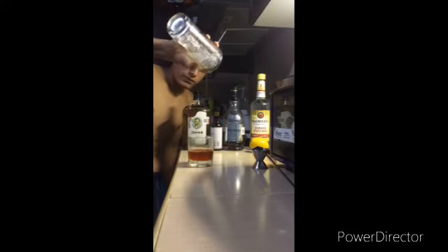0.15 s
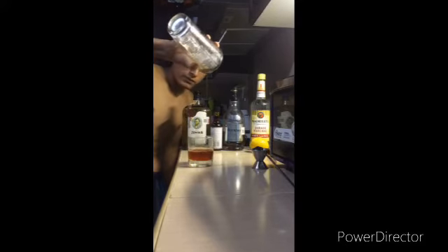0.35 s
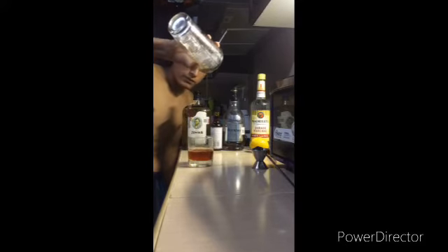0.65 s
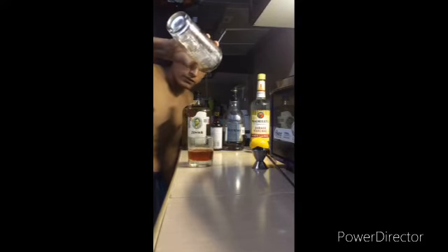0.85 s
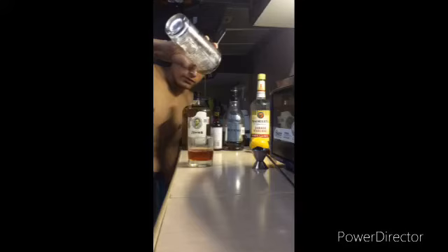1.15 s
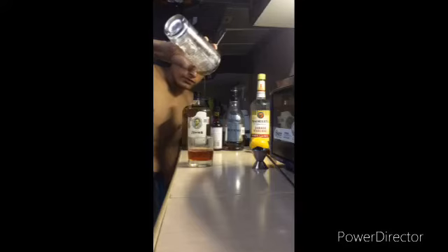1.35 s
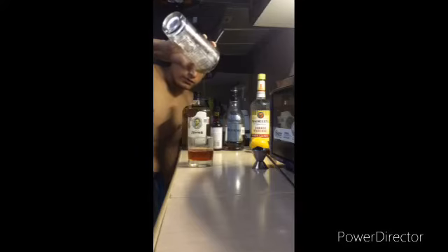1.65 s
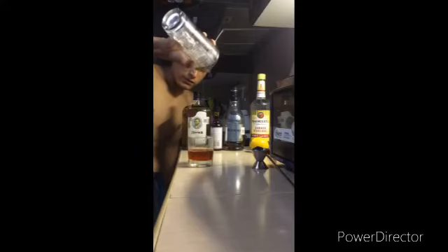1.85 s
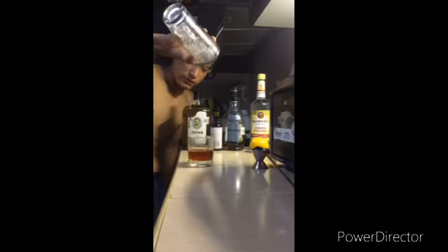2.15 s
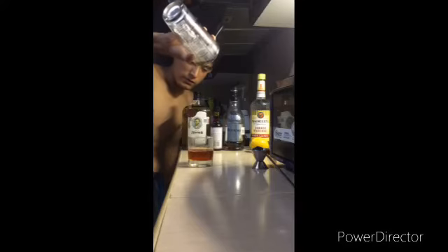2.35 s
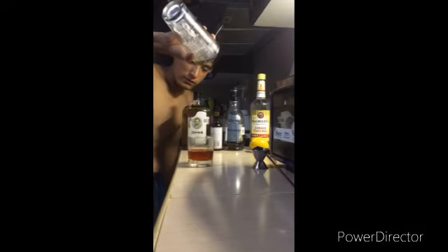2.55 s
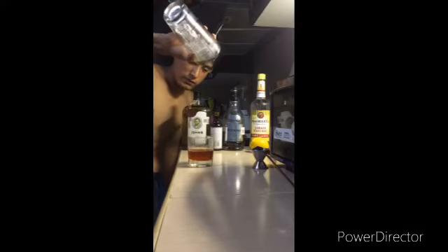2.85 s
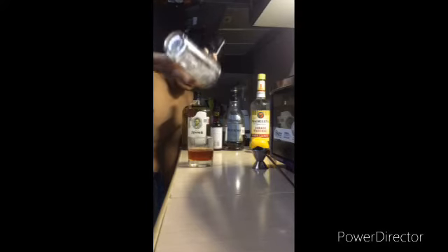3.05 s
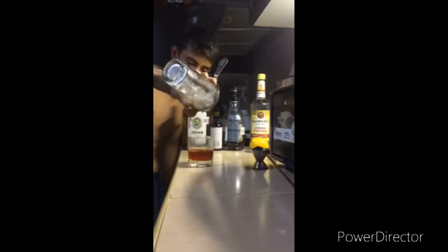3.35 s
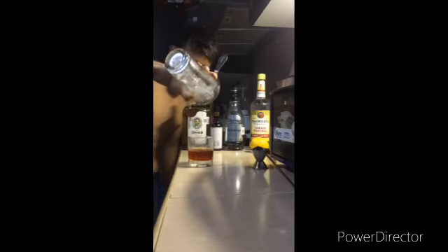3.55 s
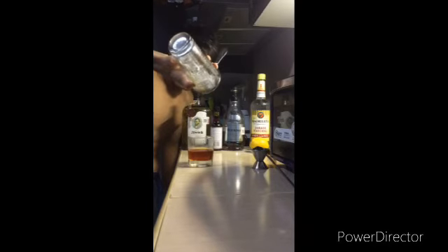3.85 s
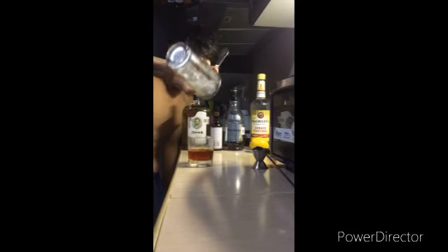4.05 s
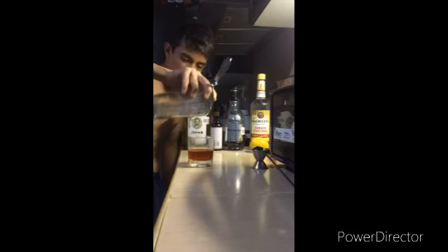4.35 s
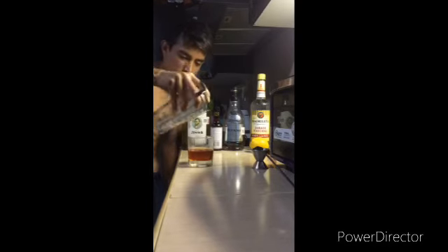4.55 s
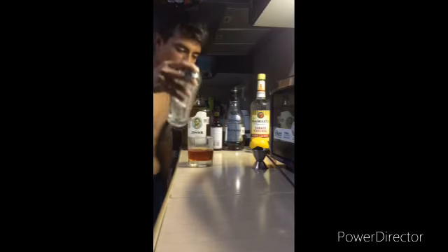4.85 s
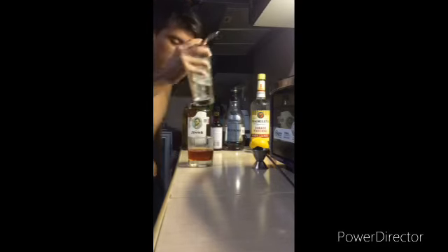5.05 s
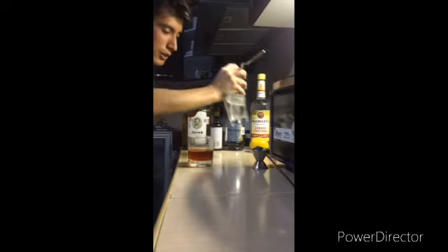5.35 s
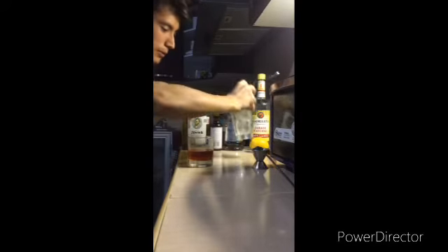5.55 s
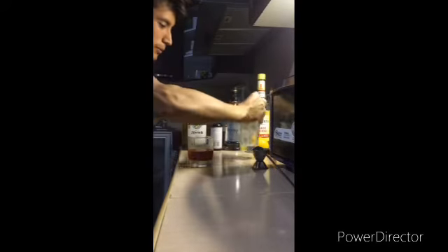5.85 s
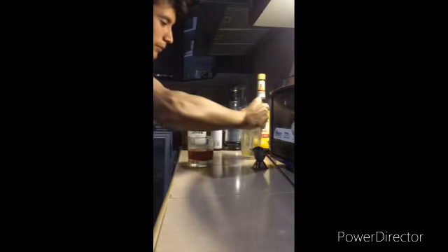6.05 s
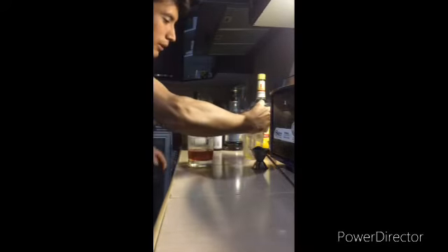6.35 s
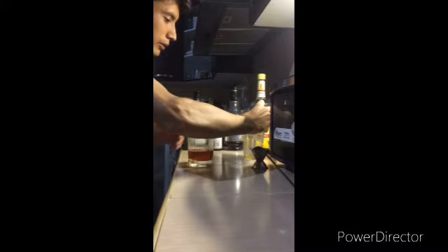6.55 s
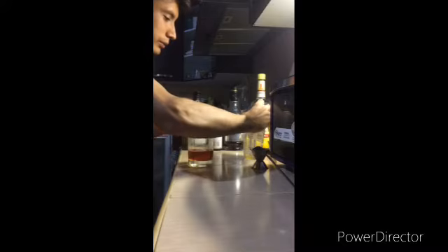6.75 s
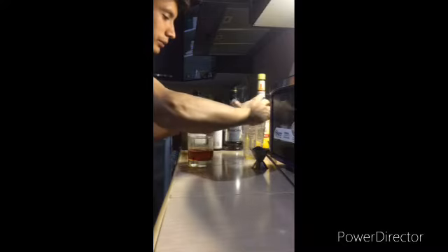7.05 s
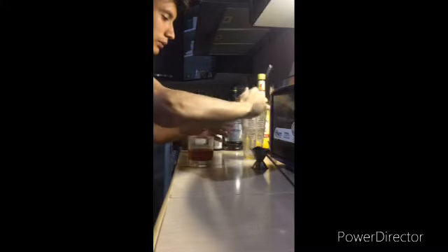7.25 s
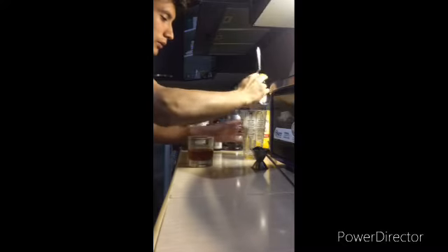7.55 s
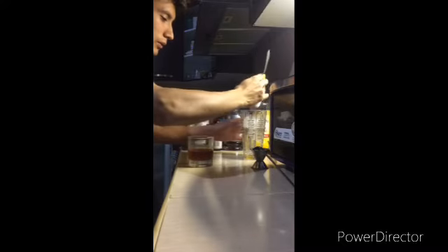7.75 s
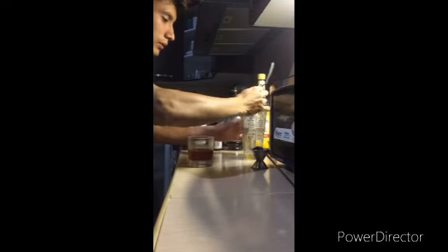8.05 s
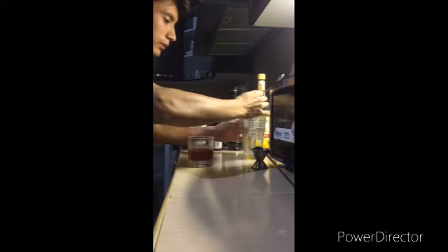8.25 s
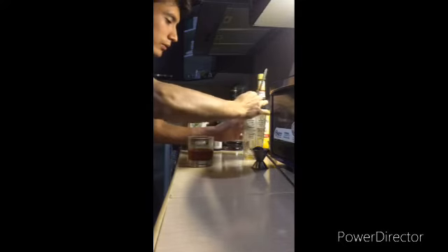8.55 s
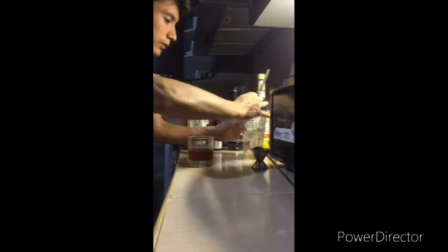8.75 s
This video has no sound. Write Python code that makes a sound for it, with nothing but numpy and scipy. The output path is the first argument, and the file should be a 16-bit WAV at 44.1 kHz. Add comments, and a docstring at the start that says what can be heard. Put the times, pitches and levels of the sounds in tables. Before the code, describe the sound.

Small, rounded water plinks and tiny high ticks of spray grow sparse over a quiet refrigerator hum. A glass is tipped upright, its ice clattering in a quick flurry and sliding to rest. A sudden dull, heavy glass-on-counter thump dominates everything, then small knocks and sporadic clinks lead to a brisk steel-on-glass rattle. Close microphone, short indoor reverberation.

```python
"""In a small room with a humming fridge, the last of a cocktail drips from a strainer into a tumbler.
Trapped air bubbles plink as damped, gliding sines; droplets tick as short bursts of filtered noise.
The mixing glass is tipped upright and its ice tumbles back, as clusters of ringing modes and cracks,
and slides to rest in a hiss. The same contact model, with other modes, sets the glass down hard
on the counter, then rattles the steel strainer and bar spoon against it."""
import sys
import numpy as np
from scipy import signal
from scipy.fft import rfft, irfft
from scipy.io import wavfile

SR = 44100
rng = np.random.default_rng(int(sys.argv[2]) if len(sys.argv) > 2 else 0)


def master_out(mix):
    """Clip the mix to full scale and print it as 16-bit PCM to the path in sys.argv[1]."""
    frames = np.transpose(np.atleast_2d(mix))
    ceiling = np.clip(frames, -1, 1)
    pcm = np.round(ceiling * 32767).astype(np.int16)
    wavfile.write(sys.argv[1], SR, pcm)


N = 392031
TIME = np.arange(N) / SR
CUTOFF_HZ = 15900


def from_db(db):
    """Decibels to gain."""
    return 10 ** (np.asarray(db) / 20)


def rms_one(x):
    """Scale to rms 1."""
    return x / np.sqrt(np.mean(x ** 2) + 1e-20)


def in_time(rows):
    """Each column of a curve at every sample."""
    s, *columns = np.transpose(rows)
    return [np.interp(TIME, s, c) for c in columns]


def at_hz(points, hz):
    """Read a table on a log-frequency axis."""
    f, value = np.transpose(points)
    return np.interp(np.log(np.maximum(hz, 1)), np.log(f), value)


def band(x, low, high):
    """Causal band-pass."""
    return signal.sosfilt(signal.butter(2, [low, high], "band", fs=SR, output="sos"), x)


def fade(t, t60):
    """Exponential decay that falls 60 dB in t60 seconds."""
    return np.exp(-np.log(1000) * t / t60)


def add(out, s, sound):
    """Mix a sound in at a time."""
    i = max(round(s * SR), 0)
    out[i:i + len(sound)] += sound[:max(N - i, 0)]


def coloured(points):
    """Steady noise with a given spectrum, rms 1."""
    hz = np.arange(N // 2 + 1) * SR / N
    return rms_one(irfft(rfft(rng.standard_normal(N)) * from_db(at_hz(points, hz)), N))


def drift(rate):
    """Slow random wandering between knots at this rate per second, knot spread 1."""
    knots = rng.standard_normal(int(rate * N / SR) + 2)
    return np.interp(TIME * rate, np.arange(len(knots)), knots)


# fridge tones: pitch_hz [Hz], level_db [dB rms]
FRIDGE_TONES = [(59.6,-68.5),(119.2,-66.5),(214.5,-61),(286.6,-68.5),(426,-69),(588,-75),(710.6,-76),(1184,-79),(3548,-85.5),(3666,-78),(3725.5,-79.5),(4673,-86.5)]
# rumble spectrum: pitch_hz [Hz], level_db [relative dB per Hz]
RUMBLE_COLOUR = [(15, -58), (25, -20), (70, -10.5), (180, -9), (217, 2.5), (263, -14), (427, -8),
                 (463, -18.5), (575, -17), (754, -27), (1190, -27.5), (2910, -35.5), (3620, -37),
                 (3920, -39), (16000, -46.5)]


def fridge(rumble_db=-54, wander=0.5):
    """Steady-level motor tones wander slightly in phase over a steady rumble of shaped noise."""
    tones = np.zeros(N)
    for hz, db in FRIDGE_TONES:
        phase = 2 * np.pi * hz * TIME + wander * np.pi * drift(4.4)
        tones += from_db(db) * np.sqrt(2) * np.sin(phase)
    return tones + from_db(rumble_db) * coloured(RUMBLE_COLOUR)


def bubble(hz, rise, t60, attack_s):
    """A bubble rings as a damped sine whose pitch climbs, an octave at most, as it nears the surface."""
    t = TIME[:int(t60 * SR) + 2]
    swell = (1 - np.exp(-t / attack_s)) * fade(t, t60)
    pitch = hz * (1 + np.tanh(rise * t))
    return swell / swell.max() * np.sin(2 * np.pi * np.cumsum(pitch) / SR)


# a deep bubble at BUBBLE_HZ rings for BUBBLE_T60_S; the damping power shortens it with pitch
BUBBLE_T60_S, BUBBLE_HZ, BUBBLE_DAMPING = 0.069, 1400, 1.37
SHALLOW_RISE_PER_S = 88   # a bubble that climbs this fast is near the surface and rings half as long


def ring_time(hz, rise):
    """Small bubbles die sooner, and so do shallow, fast-climbing ones."""
    deep_t60 = BUBBLE_T60_S * (BUBBLE_HZ / hz) ** BUBBLE_DAMPING
    return deep_t60 / (1 + abs(rise) / SHALLOW_RISE_PER_S)


def splash(hz, t60, width=1.3):
    """A droplet lands with a brief, broad tick of band-passed noise; peak 1."""
    t = TIME[:SR // 30]
    tick = band(rng.standard_normal(len(t)) * fade(t, t60), hz / width, min(hz * width, CUTOFF_HZ))
    return tick / np.abs(tick).max()


# drops that trap an air bubble: start_s [s], level_db [dB peak before trims],
# pitch_hz [Hz at the start], rise_per_s [initial pitch rise, share per s]
DROPS = [(0.016,-47,1426,10), (0.078,-53.5,1008,2.5), (0.118,-46.5,847,20.5), (.14,-49.5,1385,11),
         (.15,-49,1700,63), (.174,-45.5,963,25), (0.177,-56,2300,38), (0.1903,-36,1284,33),
         (.256,-54,3340,2), (.44,-45.5,1680,5), (.499,-57,2300,60), (.573,-37,2710,5.5),
         (.602,-35.5,1336,6.5), (.671,-48.5,1073,19), (.683,-46.5,1460,15), (0.709,-48,2660,59),
         (.874,-40.5,1048,27.5), (0.886,-44.5,1730,61), (.96,-39.5,2210,118), (.973,-43.5,2650,1),
         (1.094,-50.5,1750,85), (1.183,-43.5,2700,105), (1.196,-47.5,1850,97), (1.311,-48,1484,3),
         (1.41,-43,2310,4.5), (1.459,-48.5,1480,5), (1.48,-55,2550,94), (1.499,-43,2480,39),
         (1.557,-49.5,1450,71), (1.755,-45,1377,5), (1.776,-59,2700,43), (1.798,-34,1366,11),
         (1.986,-48,1404,9), (2.062,-51,1490,3.5), (2.127,-48.5,1400,4.5), (2.189,-53,1940,11),
         (2.303,-57.5,2850,13), (2.376,-38.5,1440,8), (2.407,-55,3380,7), (2.529,-34.5,1508,2),
         (2.639,-48.5,1770,-0.5), (2.743,-49.5,1323,4.5), (2.684,-54,2220,38), (2.811,-55,2580,-2),
         (2.866,-56,2710,2.5), (3.045,-57,2660,0), (4.096,-43.5,3585,12.5), (4.225,-43,1413,2.5),
         (4.289,-44.5,1373,2.5)]
# droplets thrown up by a drop fall back: mean delay, level, lowest pitch, pitch rise
REBOUND_S, REBOUND_DB, REBOUND_HZ, REBOUND_RISE_PER_S = .03, -58.5, 1890, 70
REBOUNDS_END_S = 1.9   # later drops throw up none


def plinks(plink_db=2.5, impact_db=-8):
    """Each drop ticks on the surface and traps a plinking bubble; the earlier ones throw up a droplet."""
    out = np.zeros(N)
    for s, db, hz, rise in DROPS:
        add(out, s, from_db(db + plink_db) * bubble(hz, rise, ring_time(hz, rise), attack_s=0.0013))
        add(out, s, from_db(db + impact_db) * splash(hz * 1.2, t60=.025, width=1.8))
        delay, octaves = rng.random(2)
        if s < REBOUNDS_END_S:
            small_hz = REBOUND_HZ * 2 ** octaves
            small_t60 = ring_time(small_hz, REBOUND_RISE_PER_S)
            droplet = bubble(small_hz, REBOUND_RISE_PER_S, small_t60, attack_s=0.00082)
            add(out, s + REBOUND_S * (.5 + delay), from_db(REBOUND_DB) * droplet)
    return out


# the loudest droplets of spray: start_s [s], level_db [dB peak before trim], pitch_hz [Hz]
SPRAY = [(.026,-47.5,6260), (0.088,-47,7700), (.385,-50,6130), (.4444,-50,11000), (.6912,-52,8900),
         (.7274,-50,6900), (.7571,-52.5,8830), (.9214,-43.5,9050), (1.0225,-50.5,8700), (1.2287,-45,7800),
         (1.3991,-41,9150), (1.4503,-43,12600), (1.8242,-47,11200), (2.019,-50,6500), (2.127,-54,6330),
         (2.2197,-41,10900), (2.4264,-48.5,11400), (2.6953,-50,6210), (2.928,-43,11700)]


def spray(trim_db=-2.5):
    """Flying droplets land as narrow, high ticks."""
    out = np.zeros(N)
    for s, db, hz in SPRAY:
        add(out, s, from_db(db + trim_db) * splash(hz, t60=0.027, width=1.14))
    return out


# thinning trickle: start_s [s], rate_per_s [fine bubbles per s]
TRICKLE = [(0, 169.5), (1.25, 140), (1.7, 55), (2.5, 30.5), (3.3, 0)]


def fizz(level_db=-64, spread_db=6.5):
    """Fine bubbles are born at random at the trickle's rate, a few much louder than most."""
    out = np.zeros(N)
    born = TIME[rng.random(N) < in_time(TRICKLE)[0] / SR]
    for s, (size, pitch) in zip(born, rng.random((len(born), 2))):
        hz = 1500 * 8 ** pitch
        db = level_db - spread_db * np.log(size + 0.1)
        add(out, s, from_db(db) * bubble(hz, rise=145, t60=17 / hz, attack_s=0.000095))
    return out


def tumbler(x, hz=1450, t60=0.049, ring_db=-4.5):
    """The air above the drink rings on after each drop, as one resonance."""
    r, w = from_db(-60 / (t60 * SR)), 2 * np.pi * hz / SR
    feed = np.array([1, 0, -1]) * (1 - r * r) / 2
    ring = signal.lfilter(feed, [1, -2 * r * np.cos(w), r * r], x + 1e-18)
    return x + from_db(ring_db) * ring


def drips():
    """Plinking drops, spray and fine fizz excite the air in the tumbler."""
    return tumbler(plinks() + spray() + fizz())


def mist(count=28, level_db=-59.5, spread_db=4.5, ends_s=2.7, lowest_hz=5030, span_octaves=1.3):
    """Faint droplets tick at random, ever more sparsely."""
    out = np.zeros(N)
    for when, size, pitch in rng.random((count, 3)):
        tick = splash(lowest_hz * 2 ** (pitch * span_octaves), t60=0.023, width=1.42)
        db = level_db - spread_db * np.log(size + 0.092)
        add(out, ends_s * (1 - np.sqrt(when)), from_db(db) * tick)
    return out


# reverberation: pitch_hz [Hz], t60_s [s]
ROOM_T60 = [(150,.44),(600,.38),(1400,.34),(2800,.27),(6000,.23),(12000,.17)]
# reverberation: pitch_hz [Hz], level_db [dB before each source's send]
ROOM_LEVEL = [(150,-7),(600,-6),(1400,-6),(2800,-7),(6000,-8),(12000,-11.5)]


def room(x, build_s=0.002):
    """Diffuse reflections that build up in a few ms and die sooner in the treble."""
    t, response = TIME[:SR * 3 // 5], 0
    edges = np.geomspace(90, CUTOFF_HZ, 13)
    for low, high in zip(edges, edges[1:]):
        hz = np.sqrt(low * high)
        build = 1 - np.exp(-(t / build_s) ** 2)
        tail = band(rng.standard_normal(len(t)), low, high) * fade(t, at_hz(ROOM_T60, hz)) * build
        even = np.sqrt(2 * (high - low) / SR / np.sum(tail ** 2))   # energy in proportion to bandwidth
        response = response + from_db(at_hz(ROOM_LEVEL, hz)) * tail * even
    return signal.fftconvolve(x, response)[:N]


def chatter(db, per_s, t60, lead_s):
    """One firm touch amid small skidding ones, which start just before it and die away after it."""
    t = TIME[:SR // 8] - 1 / 50
    skids = (rng.random(len(t)) < per_s / SR) * rng.standard_normal(len(t))
    swell = np.where(t < 0, np.exp(-np.abs(t) / lead_s), fade(np.abs(t), t60))
    touches = from_db(db) * skids * swell
    touches[SR // 50] = 1
    return touches


# boundaries of the low, middle, high and top zones of a contact: edge_hz [Hz]
ZONE_EDGES_HZ = [400, 950, 3400, 7200, 15000]


def contact_colour(colour, hollow_db, hardness):
    """A full blow lifts the body's hollow low zone; a hard one tilts up everything above the middle."""
    centres = np.sqrt(np.multiply(ZONE_EDGES_HZ[:-1], ZONE_EDGES_HZ[1:]))
    octaves = np.log2(centres / centres[1])
    return np.array(colour) + np.where(octaves < 0, hollow_db, hardness * octaves)


def voiced(x, zone_db):
    """Smoothly tilt a sound to bring its four pitch zones towards the given levels."""
    spectrum, hz = rfft(x), np.arange(len(x) // 2 + 1) * SR / len(x)
    gains = []
    for level_db, low, high in zip(zone_db, ZONE_EDGES_HZ, ZONE_EDGES_HZ[1:]):
        power = np.sum(np.abs(spectrum[(hz > low) & (hz < high)]) ** 2)
        gains.append((np.sqrt(low * high), level_db - 10 * np.log10(power)))
    return irfft(spectrum * from_db(at_hz(gains, hz)), len(x))


def blows(table, modes, colour, crack_db, crack_t60, crack_hz, ring_scale, contact_s, scatter,
          skid_db, skid_t60, lead_s, uneven_db):
    """Each contact cracks and rings the body's modes, with new strengths and slightly new pitches."""
    out, t = np.zeros(N), TIME[:SR // 5]
    hz, db, t60 = np.transpose(modes)[:, :, None]
    loose = scatter * np.minimum(hz / 3000, 1)   # the low modes shift least
    for s, level_db, hollow_db, hardness in table:
        strength, detune, phase = rng.standard_normal((3, len(modes), 1))
        tones = np.sin(2 * np.pi * (hz * (1 + loose * detune) * t + phase))
        rings = from_db(db + uneven_db * strength) * fade(t, t60 * ring_scale) * tones
        crack = from_db(crack_db) * band(rng.standard_normal(len(t)) * fade(t, crack_t60), *crack_hz)
        body = (rings.sum(0) + crack) * (1 - np.exp(-t / contact_s))
        touches = chatter(skid_db, per_s=600, t60=skid_t60, lead_s=lead_s)
        hit = signal.fftconvolve(touches, body)[:len(t)]
        hit = voiced(hit, contact_colour(colour, hollow_db, hardness))
        # the firm touch comes a fiftieth of a second into the chatter; its first 5 ms set the level
        add(out, s - 1 / 50, from_db(level_db) * hit / np.std(hit[SR // 50:SR // 40]))
    return signal.sosfilt(signal.butter(2, 110, "high", fs=SR, output="sos"), out)


def jostle(count=14, from_s=4.58, to_s=4.93, level_db=-38, spread_db=1.5, hollow_db=-6.0):
    """Light contacts of smaller cubes, unevenly spaced, while the ice tumbles."""
    place, size, hollow, hardness = rng.standard_normal((count, 4)).T
    s = np.linspace(from_s, to_s, count) + 0.0074 * place
    return list(zip(s, level_db + spread_db * size, hollow_db + 2 * hollow, hardness))


# ice against glass: start_s [s], level_db [dB rms at the touch, before trim],
# hollow_db [low-zone lift, dB], hardness [treble tilt, dB per octave]
ICE_HITS = [(4.224,-36.5,3,6.5), (4.234,-39.5,21,15), (4.283,-40,0,-4), (4.295,-33.5,21,3),
            (4.427,-27.5,-1,-3), (4.444,-34.5,-10,6.5), (4.456,-29,-9,-1), (4.482,-33.5,8,9),
            (4.562,-33.5,-10,0.5), (4.573,-26,-2.5,-4), (4.61,-31,-19,3), (4.622,-22.5,-9,3.5),
            (4.664,-21.5,-8,-2), (4.693,-25.5,5,-8), (4.713,-27,-3,2.5), (4.722,-22,-9,-3.5),
            (4.761,-23.5,-23,-5.5), (4.81,-21.5,3,0), (4.825,-35,-10,6), (4.859,-29,12,2),
            (4.887,-24,11.5,4.5), (4.917,-28.5,-4,2.5), (5.015,-38.5,13.5,1.5), (5.054,-32,10,-2),
            (5.345,-36.5,21,-8), (5.374,-18,-8,2)]
# its modes: pitch_hz [Hz], level_db [dB before colouring], t60_s [s before ring_scale]
ICE_MODES = [(547,-5,0.13),(579,-6.5,0.13),(1250,-10.5,0.043),(1354,-0.5,0.034),(1850,-6.5,0.022),(2319,-2.5,0.05),(2610,0,0.023),(2860,1.5,0.025),(3120,0,0.045),(3840,-9,0.03),(4840,-14,0.023),(5050,-15,0.012),(5850,5.5,0.015),(6010,14.5,0.015),(8890,10,0.036),(9930,14,0.024),(11500,10,0.03),(13000,15,0.03)]
# an ordinary contact: low_db, middle_db, high_db, top_db [relative dB]
ICE_COLOUR = (-5.5, -1, -11.5, -32.5)


def ice_tumble():
    """Cubes strike the glass in a flurry of bright, well-scattered modes and short cracks."""
    return from_db(-9) * blows(
        ICE_HITS + jostle(), ICE_MODES, ICE_COLOUR,
        crack_db=13.5, crack_t60=0.014, crack_hz=(480, 12000),
        ring_scale=0.77, contact_s=0.00095, scatter=0.0417,
        skid_db=-11, skid_t60=0.077, lead_s=0.007, uneven_db=5.0)


# colour of the hiss: pitch_hz [Hz], level_db [relative dB]
SWISH_COLOUR = [(700,-16),(2000,-3.5),(5000,-2.5),(8000,-7.5),(12000,-14),(16000,-24.5)]


def swish(start_s=5.375, hiss_db=-57.5, swell_s=0.09, hold_s=0.12, hiss_t60=0.33, ring_db=-40, ring_t60=0.41):
    """A soft hiss swells, holds and dies over a fading note of narrow noise, as the ice slides to rest."""
    t = np.maximum(TIME - start_s, 0)
    envelope = np.minimum(t / swell_s, 1) * fade(np.maximum(t - swell_s - hold_s, 0), hiss_t60)
    hiss = envelope * coloured(SWISH_COLOUR)
    ring = (t > 0) * fade(t, ring_t60) * rms_one(band(rng.standard_normal(N), 2100, 2500))
    return from_db(hiss_db) * hiss + from_db(ring_db) * ring


# glass base on the counter: start_s [s], level_db [dB rms at the touch, before trim],
# hollow_db [low-zone lift, dB], hardness [treble tilt, dB per octave]
KNOCKS = [(6.2665,4,3.5,0), (6.539,-26,11,-5), (6.59,-27.5,11,-4), (6.86,-35,13,-9), (7.426,-26,19.5,-7)]
# its modes: pitch_hz [Hz], level_db [dB before colouring], t60_s [s before ring_scale]
COUNTER_MODES = [(130,-22,.1),(178,-16,.1),(480,-5,.035),(598,2,.048),(730,-4,.03),(972,-3,.04),(1170,-1,.045),(1340,0,.03),(1460,0,.025),(1800,-4,.02),(2140,4,.025),(2580,1,.025),(3450,-3,.025),(3830,-5,.02),(4290,-7,.02),(6090,-13,.025),(10700,-19,.12)]
# an ordinary contact: low_db, middle_db, high_db, top_db [relative dB]
COUNTER_COLOUR = (-7.5, 1, -12, -25)


def counter_knocks():
    """The glass lands hard on the counter, then knocks it lightly: dull modes and hardly any skidding."""
    return from_db(-16.5) * blows(
        KNOCKS, COUNTER_MODES, COUNTER_COLOUR,
        crack_db=13.5, crack_t60=.021, crack_hz=(330, 7000),
        ring_scale=0.77, contact_s=.0006, scatter=0.0032,
        skid_db=-28.5, skid_t60=0.037, lead_s=0.00089, uneven_db=1.0)


# strainer and spoon against glass: start_s [s], level_db [dB rms at the touch, before trim],
# hollow_db [low-zone lift, dB], hardness [treble tilt, dB per octave]
STEEL_HITS = [(6.944,-49.5,6,9.5), (7.054,-38.5,-8,2), (7.071,-35,19,4), (7.217,-35,8,4.5),
              (7.512,-30,-1.5,-3.5), (8.29,-27,-7,8), (8.315,-17.5,-14,4.5), (8.326,-23,5,5),
              (8.36,-19,-2.5,4.5), (8.372,-20,5,4), (8.46,-34,3,3), (8.501,-25,2,2.5),
              (8.525,-18.5,4.5,2.5), (8.54,-27,-7,-12), (8.566,-18,-5,-3.5), (8.654,-30,0,-19),
              (8.664,-30.5,5,-3), (8.693,-29,4,-8), (8.723,-37,-2,-4), (8.749,-28,7.5,0.5),
              (8.774,-22,-5,-4.5)]
# its modes: pitch_hz [Hz], level_db [dB before colouring], t60_s [s before ring_scale]
STEEL_MODES = [(607.6,0.5,0.1),(764,-6.5,0.064),(873,-8,0.077),(1250,-4.5,0.05),(1400,4,0.018),(2168,5,0.05),(2420,-5.5,0.21),(2780,4,0.024),(2936,-16.5,0.078),(4100,-24,0.047),(4906,-7,0.11),(5730,-13,0.058),(5790,0.5,0.079),(7760,-25,0.059),(8550,10.5,0.032),(9260,-7,0.058),(9600,-4,0.045),(11300,-7,0.032),(13000,-6,0.1)]
# an ordinary contact: low_db, middle_db, high_db, top_db [relative dB]
STEEL_COLOUR = (-1, 0.5, -13.5, -19.5)


def steel_rattle():
    """Strainer and spoon rattle on the glass with a quick attack, steady pitches and strong skidding."""
    return from_db(-6.5) * blows(
        STEEL_HITS, STEEL_MODES, STEEL_COLOUR,
        crack_db=5, crack_t60=0.025, crack_hz=(280, 11000),
        ring_scale=0.37, contact_s=0.00039, scatter=0.007,
        skid_db=-7.5, skid_t60=0.066, lead_s=0.0022, uneven_db=3.0)


def scene():
    """Drink, ice, counter and steel share one room; swish and fridge stay dry."""
    drink = drips() + mist()
    ice = ice_tumble()
    knocks = counter_knocks()
    steel = steel_rattle()
    sends = from_db(3.0) * drink + ice + from_db(1.0) * knocks + from_db(1.5) * steel
    return (fridge() + drink + ice + swish() + knocks + steel + room(sends))[None]


def record(dry):
    """Peaks are clipped at full scale, then the top is cut."""
    low_pass = signal.ellip(10, .1, 70, CUTOFF_HZ, fs=SR, output="sos")
    return signal.sosfilt(low_pass, np.clip(dry, -1, 1))


dry = scene()
out = record(dry)
master_out(out)
```